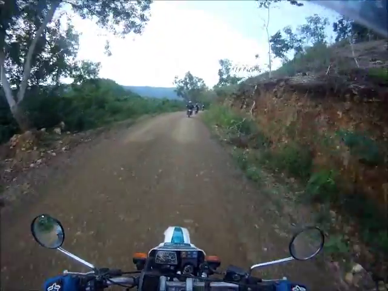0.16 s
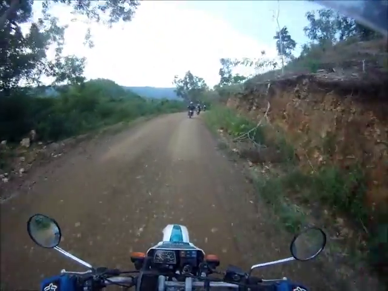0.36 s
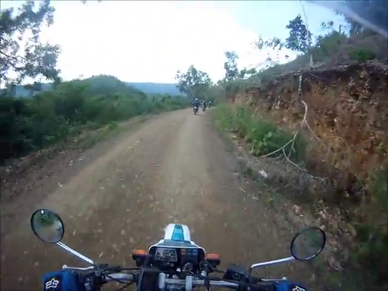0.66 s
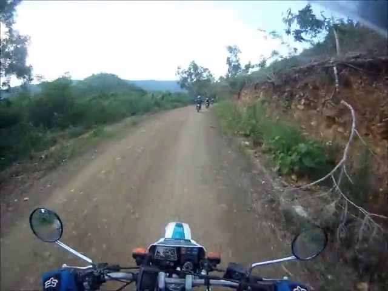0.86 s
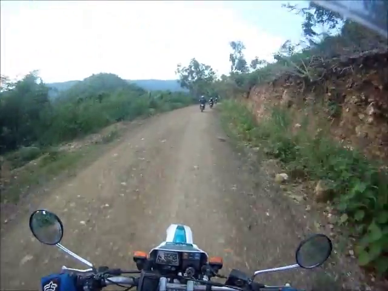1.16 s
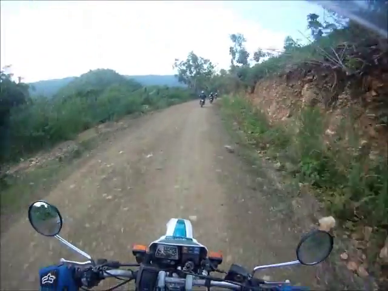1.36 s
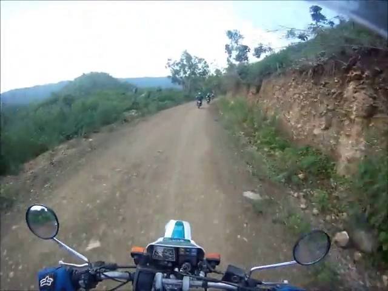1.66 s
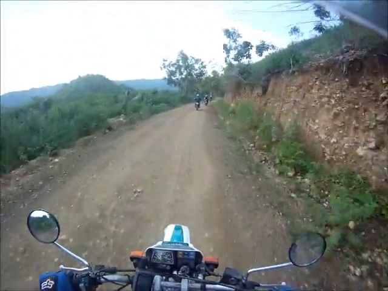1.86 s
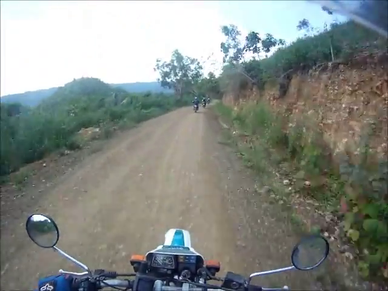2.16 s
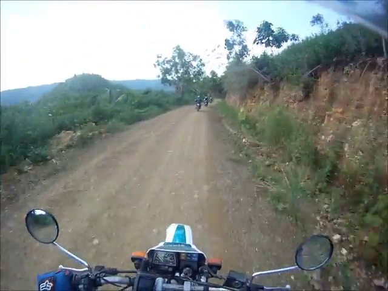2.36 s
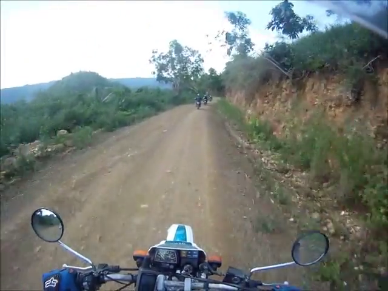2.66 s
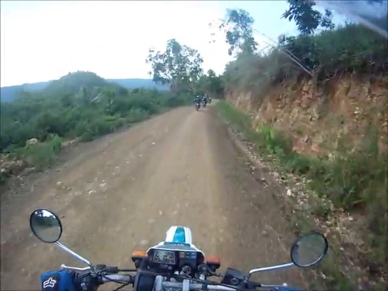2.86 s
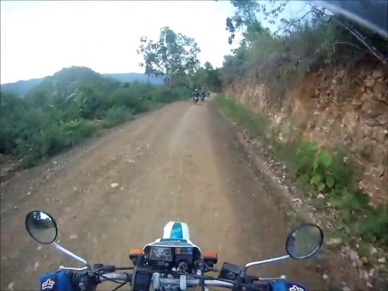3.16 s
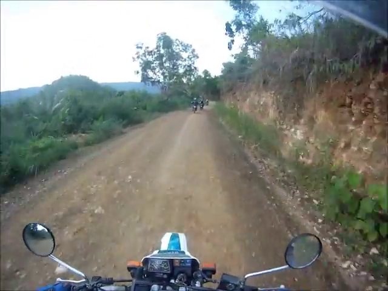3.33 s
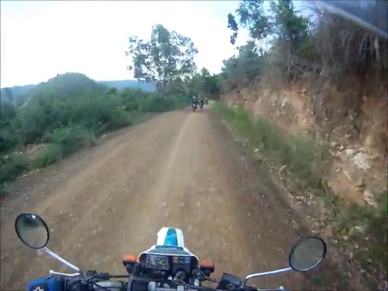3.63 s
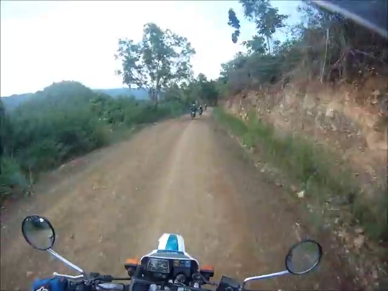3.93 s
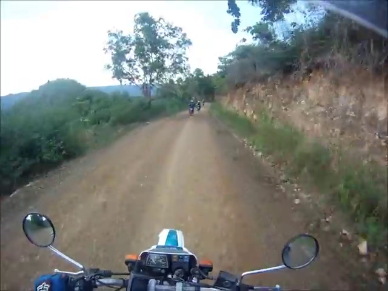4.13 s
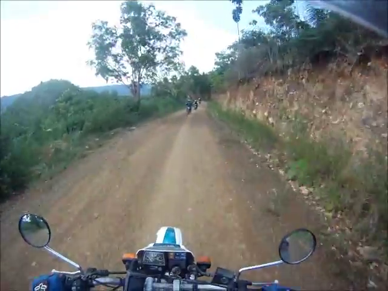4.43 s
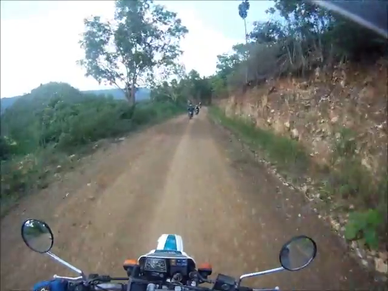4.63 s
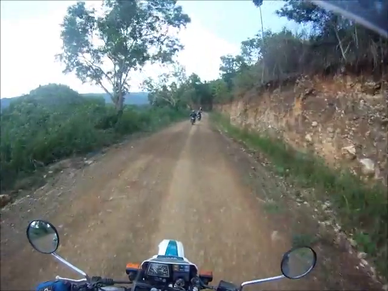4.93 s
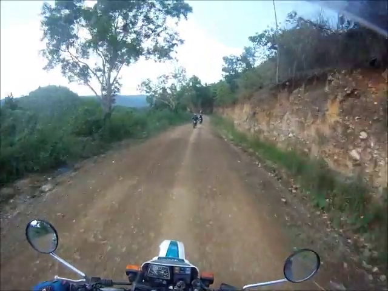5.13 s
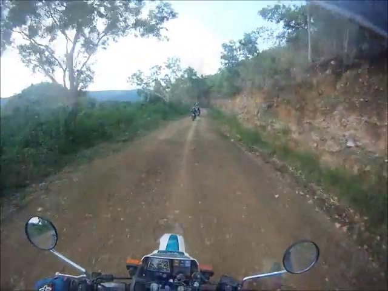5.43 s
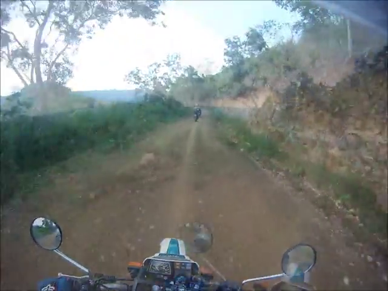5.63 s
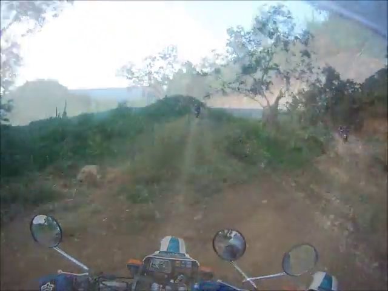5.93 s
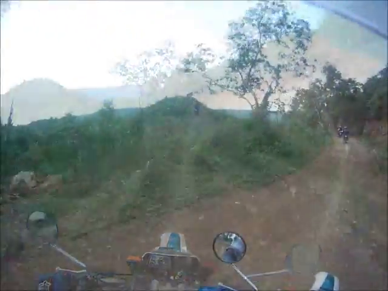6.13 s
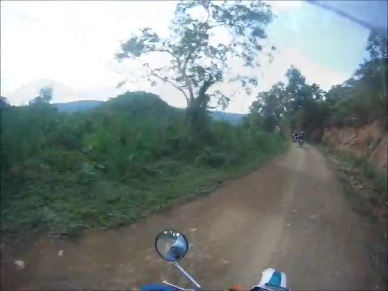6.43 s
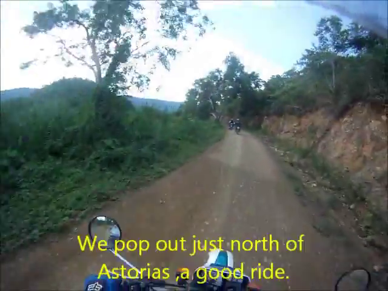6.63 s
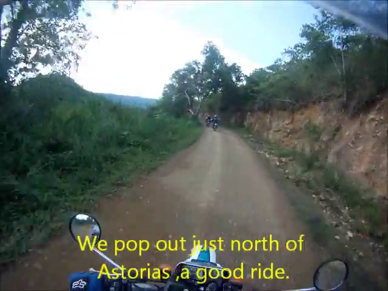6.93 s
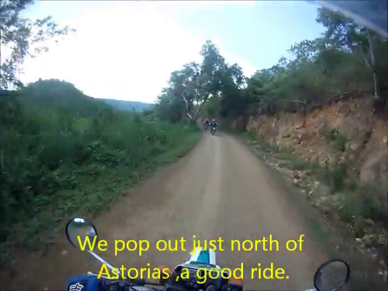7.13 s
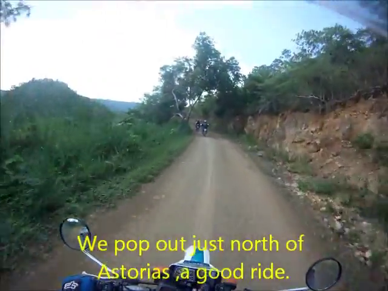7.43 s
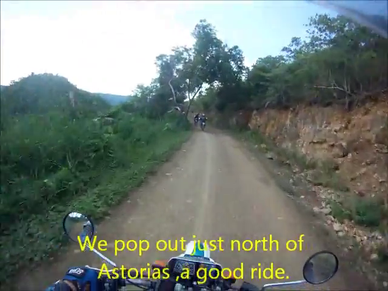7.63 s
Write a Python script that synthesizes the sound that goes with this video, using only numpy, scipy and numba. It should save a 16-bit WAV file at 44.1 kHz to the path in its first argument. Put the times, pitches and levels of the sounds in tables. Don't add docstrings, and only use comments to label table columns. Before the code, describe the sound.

A single-cylinder trail motorbike chugs at a nearly constant pace, its low thumps and hollow exhaust bark heard through a helmet-mounted, sealed camera. Wind buffets and roars, with hiss and a thin wavering whistle. A hard knock comes near three seconds; later two stretches of riding overlap, thickening the sound, before a small tick leaves one engine running on.

```python
import sys
import numpy as np
from scipy import signal
from scipy.fft import rfft, irfft, next_fast_len
from scipy.io import wavfile
from scipy.ndimage import uniform_filter1d, map_coordinates
from numba import njit

SR = 44100
rng = np.random.default_rng(int(sys.argv[2]) if len(sys.argv) > 2 else 0)


def file_out(sig):
    cols = np.atleast_2d(sig).T
    lim = np.clip(cols, -1, 1)
    pcm = np.round(lim * 32767).astype(np.int16)
    wavfile.write(sys.argv[1], SR, pcm)


def level_to_linear(level):
    exponent = np.asarray(level, float) / 20
    return 10 ** exponent


N = 343098


def unit(x):
    return x / np.sqrt(np.mean(np.abs(x) ** 2) + 1e-20)


def curves(rows):
    time_s, *columns = np.transpose(rows)
    return [np.interp(np.arange(N) / SR, time_s, column) for column in columns]


def wobble(rate_hz):
    knots = rng.standard_normal(int(N * rate_hz / SR) + 4)
    return map_coordinates(knots, [np.arange(N) * rate_hz / SR])


def filtered(x, response):
    m = next_fast_len(N + SR // 2)
    return irfft(rfft(x, m) * response(np.fft.rfftfreq(m, 1 / SR)), m)[:N]


def resonances(modes):
    def response(f):
        total = 0
        for k, (hz, width_hz, db) in enumerate(modes):
            damping = 1j * f * width_hz
            total = total + (-1) ** k * level_to_linear(db) * damping / (hz * hz - f * f + damping)
        return total
    return response


def rush(spectrum, patchy_db):
    z = signal.stft(rng.standard_normal(N + SR // 10), nperseg=512)[2]
    field = uniform_filter1d(rng.standard_normal(z.shape), size=5, axis=0)
    field = uniform_filter1d(field, size=10, axis=1)
    air = signal.istft(z * level_to_linear(patchy_db * unit(field)), nperseg=512)[1][:N]
    hz, db = np.transpose(spectrum)
    return unit(filtered(air, lambda f: level_to_linear(np.interp(np.log(f + 1), np.log(hz), db))))


def engine(rate_rows, start_s, lead):
    # (time [s], peak level [dB], times in a row)
    heavy = [(0.065, -5.5, 1), (0.161, -5, 1), (0.392, -5.5, 1), (1.238, -7, 1), (1.521, -5, 1),
             (1.801, -7, 2), (2.312, -5, 2), (2.861, -6, 2), (3.406, -8.5, 1), (3.585, -4.5, 4),
             (4.162, -4.5, 1), (4.604, -5.5, 2), (4.913, -6, 1), (5.13, -5.5, 1), (5.293, -2.5, 1),
             (5.709, -6, 1), (6.038, -5.5, 1), (6.284, -8, 1), (6.63, -6, 1), (6.816, -6, 1), (6.98, -6, 3),
             (7.31, -6.5, 1), (7.392, -5.5, 1), (7.518, -5.5, 1), (7.685, -6.5, 1)]
    # (frequency [Hz], width [Hz], level [dB])
    pipe = [(64.8, 11.5, 1.5), (121.3, 57, -10.5)]
    rate_hz, = curves(rate_rows)
    cycles = np.cumsum(rate_hz * (np.arange(N) >= start_s * SR)) / SR - lead
    whole = np.arange(int(cycles[-1]) + 1)
    chance = rng.standard_normal((len(whole), 3))
    at = np.interp(whole + 0.009 * chance[:, 0], cycles, np.arange(N))

    size_db = 0.1 * chance[:, 1]
    for time_s, db, times in heavy:
        miss = np.abs(at - (time_s - .007) * SR)
        in_reach = miss.min() < .007 * SR
        size_db[miss.argmin()::3][:round(times)] += in_reach * 1.76 * max(db + 8.5, 0)

    blows = np.bincount(at.astype(int), -level_to_linear(0.78 * size_db), N)
    boom = unit(filtered(blows, lambda f: resonances(pipe)(f) * resonances([(85, 90, 0)])(f)))
    later = np.minimum(at + .0036 * SR, N - 1).astype(int)
    raps = np.bincount(later, -level_to_linear(size_db + 1.45 * chance[:, 2]), N)
    bark = unit(filtered(raps, lambda f: resonances([(258, 100, 0)])(f) ** 2))
    return boom + level_to_linear(-11.5) * bark, 2 * np.pi * cycles, np.interp(cycles, whole + 0.1, size_db)


def exhaust_gas(puff, size_db):
    # (frequency [Hz], width [Hz], level [dB])
    case = [(251, 110, -5.5), (330, 58, 1.5), (598, 42.4, -2), (2158, 140, -22.5), (4060, 100, -55)]
    noise = filtered(rng.standard_normal(N), resonances(case))
    return unit(level_to_linear(2.0 * puff + size_db + 1.6 * wobble(60)) * noise)


def head_wind(steady_rows, gust_rows):
    steady_db, calm_db = curves(steady_rows)
    time_s, length_s, strength_db, hz, whistle_db = np.transpose(gust_rows)
    t = np.arange(N) / SR
    bells = np.exp(-(2 * (t[:, None] - time_s) / length_s) ** 2)
    gust_db = bells @ strength_db
    roar_db = -29.5 + steady_db + 0.61 * gust_db
    hiss_db = -45 + 0.43 * steady_db + 0.91 * gust_db
    pitch_hz = np.interp(t, time_s, hz) - 59.47 * (1 - bells.max(axis=1))
    sing_db = 20 * np.log10(level_to_linear(calm_db) + bells @ level_to_linear(whistle_db))
    return roar_db, hiss_db, pitch_hz, sing_db


def wind_noise(puff, roar_db, hiss_db, buffet_db):
    # (frequency [Hz], level [dB per Hz])
    buffet_spectrum = [(12, -41), (30, -5.5), (60, 2), (120, 1.5), (200, -7), (400, -25), (800, -53.5)]
    roar_spectrum = [(100, -41), (220, -3), (300, 0), (440, -4.5), (590, -2), (630, -7), (680, -9.5),
                     (800, -10), (870, -13), (1100, -12.5), (1500, -24.5), (2500, -54)]
    hiss_spectrum = [(900, -40), (1500, -4), (1800, -2), (2300, 1), (2900, -4), (3400, -11.5), (3970, -8),
                     (4250, -13), (5000, -16), (5900, -25.5), (6300, -42)]
    gust = .6 * wobble(9)
    roar = unit(level_to_linear(0.5 * puff + 0.93 * gust) * rush(roar_spectrum, patchy_db=1.0))
    hiss_gain_db = 0.5 * puff + 1.2 * gust + 1.63 * wobble(150)
    hiss = unit(level_to_linear(hiss_gain_db) * rush(hiss_spectrum, patchy_db=0.82))
    buffet = unit(level_to_linear(3.65 * wobble(12)) * rush(buffet_spectrum, patchy_db=-0.5))
    low = level_to_linear(buffet_db + 0.69 * (roar_db + 30.0)) * buffet
    return low + level_to_linear(roar_db + 2.5) * roar + level_to_linear(hiss_db + 2.5) * hiss


def whistle(hz, db, width_hz):
    flutter = unit(.8 + wobble(width_hz) + 1j * wobble(width_hz))
    phase = 2 * np.pi * np.cumsum(hz + 15 * wobble(40)) / SR
    return level_to_linear(db + 3) * np.real(flutter * np.exp(1j * phase))


@njit
def gain_rider(x, knee, attack, release):
    out, held, gain = np.empty_like(x), knee, 1.0
    for i in range(len(x)):
        held = max(abs(x[i]), knee + (held - knee) * release)
        gain = knee / held + (gain - knee / held) * attack
        out[i] = gain
    return out


def ride(rate_rows, wind_rows, gust_rows, lead, start_s, end_s, thump_db, whistle_width_hz, buffet_db):
    thump, angle, size_db = engine(rate_rows, start_s, lead)
    roar_db, hiss_db, whistle_hz, whistle_db = head_wind(wind_rows, gust_rows)
    puff = np.cos(angle - .7)
    x = level_to_linear(thump_db) * thump + level_to_linear(roar_db - 1.45) * exhaust_gas(puff, size_db)
    x = x + wind_noise(puff, roar_db, hiss_db, buffet_db)
    x = x + whistle(whistle_hz, whistle_db, whistle_width_hz)
    attack_s, release_s = 0.0037, 0.062
    gain = gain_rider(x, 0.41, np.exp(-1 / (attack_s * SR)), np.exp(-1 / (release_s * SR)))
    t = np.arange(N) / SR
    return x * gain * np.clip((t - start_s) / 0.014, 0, 1) * (t < end_s)


def knocks():
    # (time [s], peak level [dB], frequency [Hz])
    hits = [(0.15, -6.5, 330), (3.221, 0, 389.6), (4.157, -11, 306), (5.292, -8, 330), (5.911, 0, 300),
            (6.285, -23, 353), (7.666, -12, 730), (1.196, -24, 900), (.37, -15, 590), (3.054, -21, 704),
            (7.589, -22, 600)]
    x, t = np.zeros(N + SR), np.arange(SR // 40) / SR
    for time_s, db, hz in hits:
        push = level_to_linear(db + 8.5 - 60 * t / 0.012) * (1 - np.exp(-t / 0.0026))
        x[round(time_s * SR):][:len(t)] -= push * np.cos(2 * np.pi * hz * t)
    return x[:N]


def grit():
    # (time [s], peak level [dB])
    grains = [(0.0008, -34), (.395, -47), (0.72, -54), (1.105, -47), (1.197, -45), (3.589, -48),
              (3.886, -52), (4.567, -41), (4.903, -49), (5.13, -46), (5.26, -44)]
    x, t = np.zeros(N + SR), np.arange(SR // 300) / SR
    for time_s, db in grains:
        x[round(time_s * SR):][:len(t)] += level_to_linear(db + 15 - 60 * t / 0.0044) * rng.standard_normal(len(t))
    return x[:N]


def scene():
    # (time [s], rate [firings per s])
    first_rate = [(0, 21.6), (1, 21.1), (2.6, 21.8), (4, 22.57), (5.6, 23.08), (6.72, 23.95)]
    second_rate = [(5.2, 24.04), (5.7, 24.13), (6.2, 24.38), (6.7, 24.39), (7.2, 24.26), (7.78, 23.59)]
    leads = (.262, .03)
    # (start [s], end [s], thump level [dB], whistle width [Hz], buffet level [dB])
    stretches = [
        (0, 6.717, -15.5, 200.3, -23),
        (5.2, 8.5, -19, 120.1, -22),
    ]
    # (time [s], strength [dB], whistle level between gusts [dB])
    winds = [
        [(0, 0.5, -39.5), (5.15, -.5, -45.5), (5.5, 7, -41), (6.3, 3.5, -47), (6.72, 4.5, -47)],
        [(5.2, 4.5, -60), (5.4, 5.5, -58), (5.65, 1.5, -57), (5.95, 7, -54), (6.45, 5.5, -52), (6.79, 4.5, -40),
         (6.86, 1.5, -38.5), (7.78, 1.5, -40)],
    ]
    # (time [s], length [s], strength [dB], whistle pitch [Hz], whistle level [dB])
    first_gusts = [(0, .2, 3, 1103, -38), (0.342, .2, 3, 1099, -45), (.6, .2, 1.5, 1004, -51),
                   (1.052, 0.27, 2.5, 1139, -44), (1.206, 0.1686, 6, 1090, -50),
                   (1.603, 0.22, -2.3, 1040, -69), (1.832, 0.28, 3, 1121, -42), (2.398, .3, 2.7, 1100, -44),
                   (2.946, 0.13, 1.8, 1146, -39), (3.177, .2, 3.5, 1120, -39.5),
                   (3.6, .2, 1.7, 1030, -42.5), (3.96, .1, 1, 1200, -42), (4.095, 0.12, 4.5, 1228, -43),
                   (4.302, .14, 2, 1247, -37.5), (4.602, .25, 0.3, 1040, -39.5),
                   (5.11, 0.0686, 3, 1030, -31), (5.25, .14, .4, 1225, -37), (5.451, 0.23, -1.5, 1219, -36),
                   (6.099, .4, 2, 1108, -45)]
    second_gusts = [(6.4, .15, 4.4, 1230, -45), (6.58, 0.0802, 0.37, 1270, -38),
                    (6.69, 0.202, 1.6, 1503, -34), (6.79, 0.0696, 2.8, 1455, -42),
                    (6.9, 0.0991, 0.37, 1410, -41.5), (7.1, 0.0915, 0.59, 1458, -42),
                    (7.21, 0.0694, .4, 1488, -53), (7.3, 0.106, 2.8, 1440, -41),
                    (7.38, 0.0965, .3, 1303, -37.5), (7.499, 0.088, 3.5, 1410, -37),
                    (7.66, .09, 1.6, 1366, -46)]
    mono = knocks() + grit()
    parts = zip((first_rate, second_rate), winds, (first_gusts, second_gusts), leads, stretches)
    for rate_rows, wind_rows, gust_rows, lead, settings in parts:
        mono = mono + ride(rate_rows, wind_rows, gust_rows, lead, *settings)
    return np.array([mono, mono])


def roll_off(x):
    return signal.sosfilt(signal.butter(12, 15570, fs=SR, output="sos"), x)


def record(dry):
    # (frequency [Hz], level [dB per Hz])
    side_spectrum = [(30, -9), (120, 4), (500, -13), (1000, -20.5), (1600, -16), (5000, -24), (6000, -35),
                     (7000, -26), (10000, -30.5), (10500, -55), (15000, -47)]
    camera_hz = 12000
    smooth = filtered(dry[0], lambda f: 1 / (1 + (f / 5600) ** 12))
    coarse = map_coordinates(smooth, [np.arange(N * camera_hz // SR + 1) * SR / camera_hz])
    mono = signal.resample_poly(np.repeat(coarse, 4), 147, 160)[:N]
    mono[round(6.717 * SR)] += .07
    mono = mono * np.clip((N - np.arange(N)) / (.004 * SR), 0, 1)
    mono = mono / (1 + np.abs(mono / .96) ** 8) ** (1 / 8)
    side = level_to_linear(-54.5) * unit(level_to_linear(9.5 * wobble(30)) * rush(side_spectrum, patchy_db=1.0))
    return roll_off(np.array([mono + side, mono - side]))


dry = scene()
out = record(dry)
file_out(out)
```